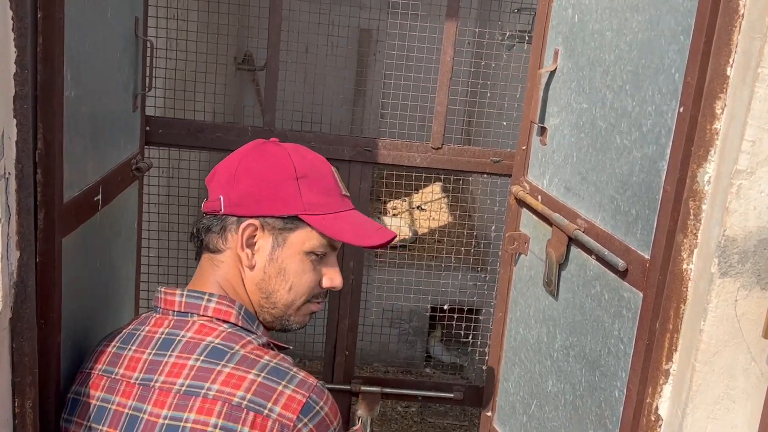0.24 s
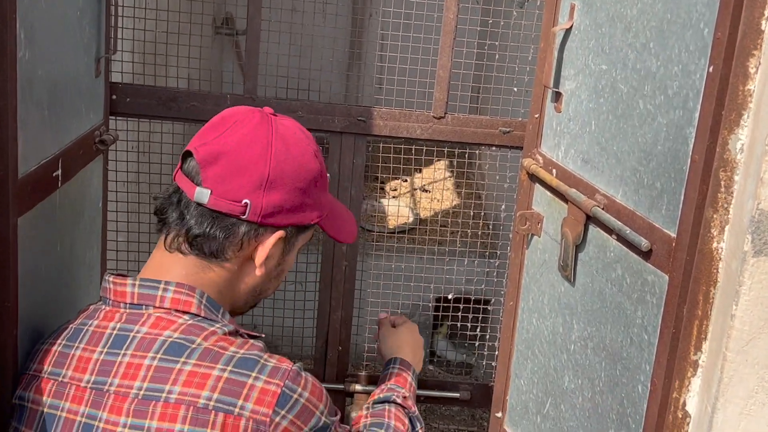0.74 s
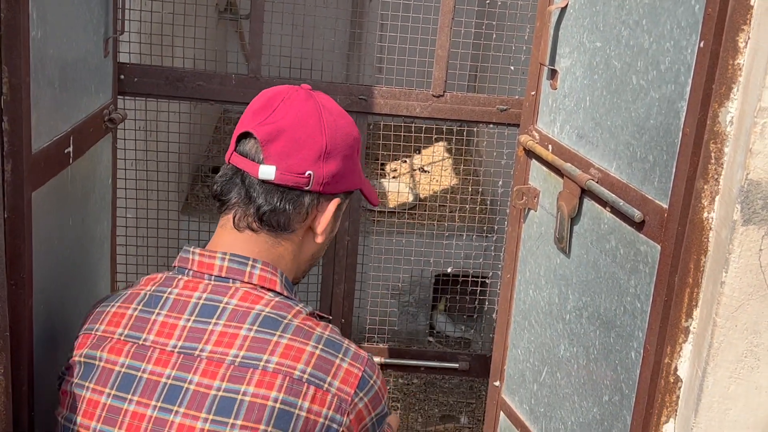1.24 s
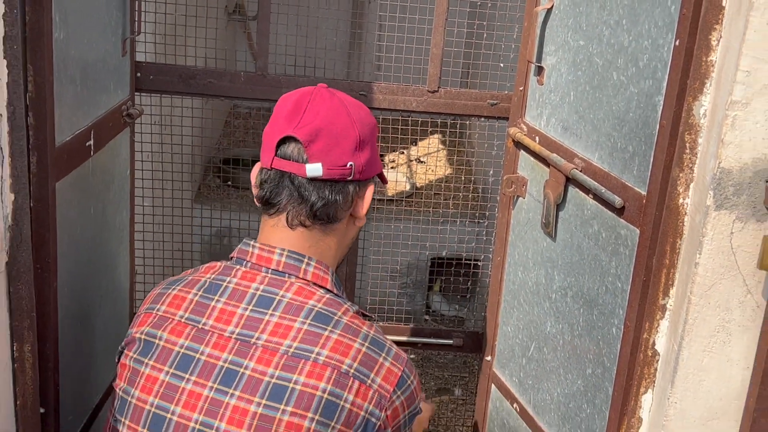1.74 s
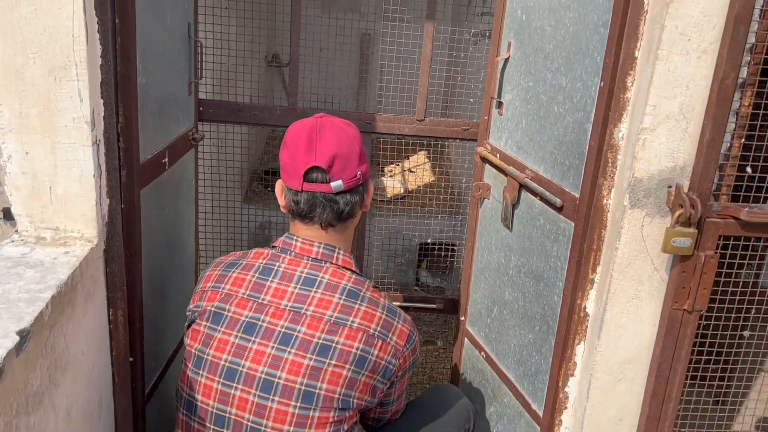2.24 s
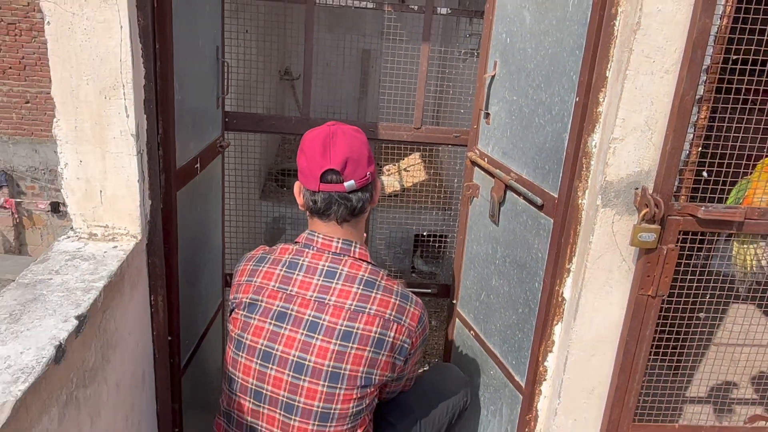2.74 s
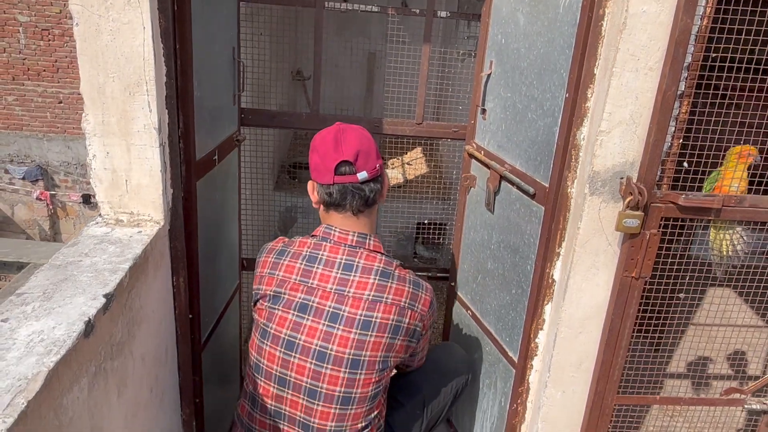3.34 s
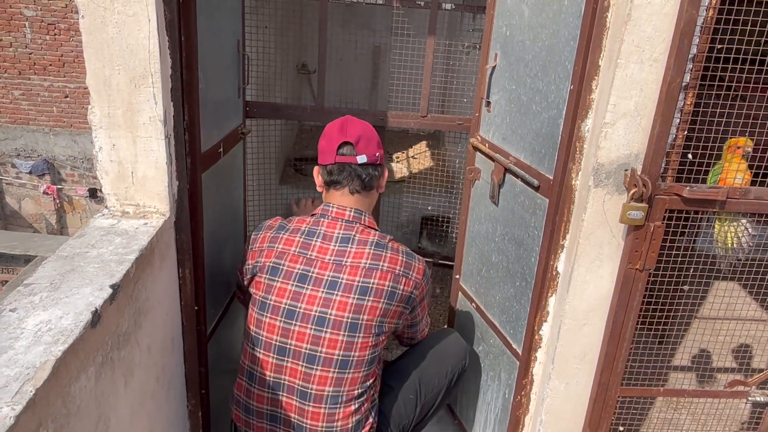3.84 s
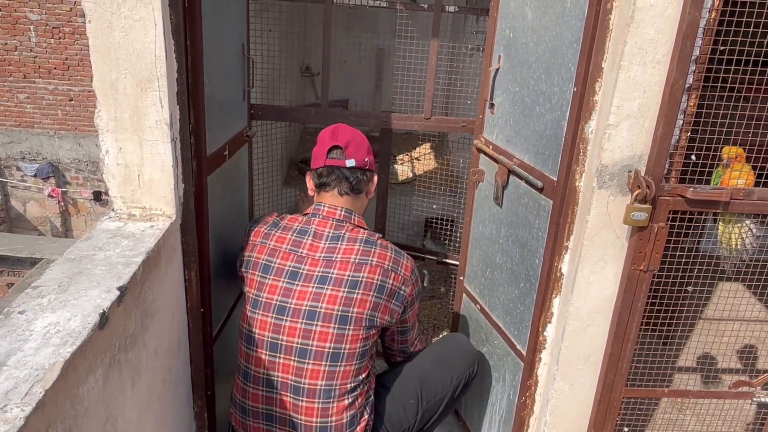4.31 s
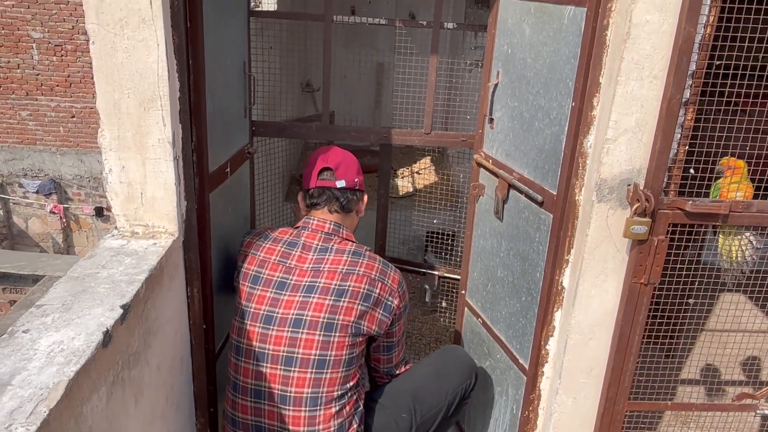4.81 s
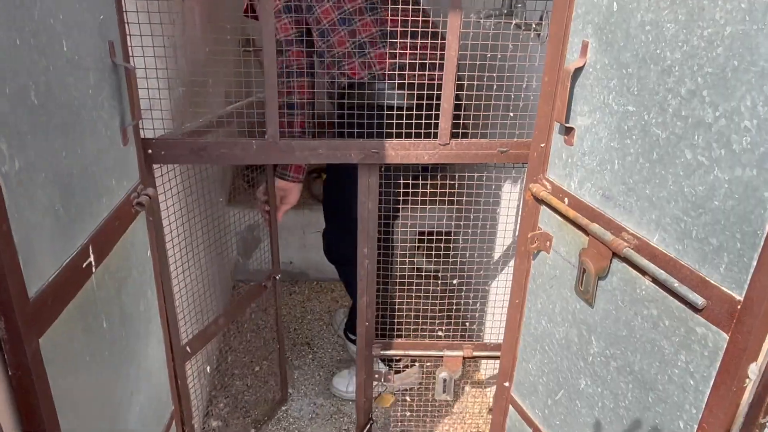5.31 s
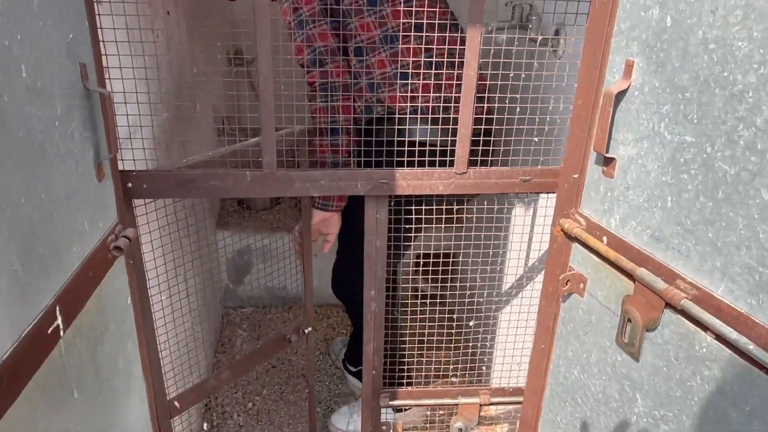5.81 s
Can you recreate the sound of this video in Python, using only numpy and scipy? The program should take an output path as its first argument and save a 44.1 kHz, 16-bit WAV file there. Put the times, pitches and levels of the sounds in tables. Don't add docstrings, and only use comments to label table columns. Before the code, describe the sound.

Parrots squawk shrilly and whistle in a caged yard while a steel mesh door knocks, squeaks and scrapes, with distant traffic behind.

```python
import sys
import numpy as np
from scipy import signal
from scipy.fft import rfft, irfft, next_fast_len
from scipy.io import wavfile
from scipy.ndimage import map_coordinates

SR = 44100
rng = np.random.default_rng(int(sys.argv[2]) if len(sys.argv) > 2 else 0)


def digitize_waveform(pressure):
    field = np.atleast_2d(pressure).T
    bounded = np.clip(field, -1, 1)
    quanta = np.round(bounded * 32767).astype(np.int16)
    wavfile.write(sys.argv[1], SR, quanta)


def ratio_of_db(decibels):
    return 10 ** (np.asarray(decibels, float) / 20)


N = 267334
TURN_S = 2.7
LEFT_RIGHT = np.array([[0.5], [-0.5]])

# time_s, level_db
TRAFFIC = [(0.0, -31.5), (0.5, -40.5), (0.54, -38), (0.57, -40.5), (1.04, -36.5), (1.23, -49),
           (1.55, -36.5), (2.45, -46), (2.67, -33), (2.88, -39), (3.41, -38), (3.59, -56.5), (3.83, -40.5),
           (3.9, -57.5), (4.59, -51.5), (4.62, -43), (4.71, -49), (6.06, -44.5)]
# freq_hz, level_db (per Hz)
RUMBLE = [(15, -31), (25, -24), (47, -1), (70, 2), (136, -8), (220, -17.5), (320, -21.5), (420, -18.5),
          (700, -120)]
# freq_hz, level_db (per Hz)
WASH = [(180, -3.5), (400, -2), (1400, -5), (3400, -15.5), (5500, -23), (8500, -28.5), (10700, -21),
        (12700, -22.5), (14200, -21.5), (16000, -24)]
# start_s, length_s, level_db
SHUFFLES = [
    (0.114, 0.39, -49.5),
    (0.496, 0.43, -47),
    (0.92, 0.53, -44.5),
    (1.258, 0.64, -47.5),
    (2.455, 0.27, -45.5),
    (3.0, .35, -60),
    (5.19, 0.42, -52.5),
    (5.519, .12, -52.5),
]
# start_s, peak_db, low_knock_db (against the peak), t60_s
KNOCKS = [(0.0313, -40.5, -0.5, 0.074), (0.1324, -11.5, -8, 0.06), (0.4958, -8.5, -23.5, 0.087),
          (0.7382, -49.5, 0, 0.072), (0.805, -51, 6.5, 0.11), (0.9173, -37, 1, 0.23),
          (1.1767, -39.5, 8.5, 0.33), (1.2471, -23, -3, 0.2), (1.3962, -21, -18.5, 0.22),
          (2.4803, -26.5, -1, 0.17), (2.9193, -43, -3, 0.72), (3.602, -46.5, -9, 0.1145),
          (4.4657, -32, -2, 0.21), (5.0829, -26, -6.5, 0.036), (5.1881, -26.5, -10.5, 0.3),
          (5.3472, -43, -6.5, 0.065), (5.3781, -56, 11, 0.011), (5.4445, -43.5, -36, 0.062),
          (5.475, -62, -8, 0.11), (5.5104, -49, -10, 0.067), (5.5342, -56.5, 12, 0.012),
          (5.5702, -44, -17, 0.05), (5.5927, -41.5, -33.5, 0.087), (5.7004, -48, -12, 0.082),
          (5.7572, -47, -10, 0.049), (5.7924, -51.5, 13, 0.025), (5.8852, -50, 19, 0.03)]
# freq_hz, level_db, t60_s
SHEET_MODES = [(1440, -2, 0.21), (2412, -42, 0.13), (4010, -4, 0.13), (5000, -3.5, 0.26), (5900, -6, 0.16),
               (8300, -8, 0.43), (11600, -10, 0.077), (13740, -6.5, 0.12), (15000, 4, 0.016)]
# start_s, freq_hz, level_db, t60_s
PINGS = [
    (3.3, 7900, -36, 0.2),
    (3.008, 11790, -28, .3),
    (.134, 13900, -31, 0.072),
]
# start_s, length_s, level_db
SQUEAK = (.36, 0.19, -44)
# freq_hz, level_db
HINGE_MODES = [(8274, -63), (10847, -53), (12086, -60), (12963, -75), (13937, -63), (14739, -51.5)]
# start_s, length_s, level_db
SCRAPES = [
    (0.912, 0.72, -56.5),
    (1.467, 0.54, -42),
    (1.829, 0.11, -23.5),
    (2.463, 0.32, -47.5),
    (3.7, 0.17, -56.5),
    (3.273, 0.27, -37),
    (5.194, 0.063, -35),
]
# freq_hz, level_db (per Hz)
SCRAPE_COLOUR = [(250, -7.5), (1400, -9), (2400, 0.5), (3500, 8.5), (6000, 7), (9600, 4.5), (10700, 8),
                 (12700, 7), (15500, -11)]
# start_s, length_s, top_pitch_hz, level_db
WHISTLES = [
    (1.005, .24, 2956, -28),
    (2.495, 0.26, 3027, -39.5),
    (3.703, 0.25, 3040, -32.5),
    (5.792, 0.25, 3170, -41.5),
]
# start_s, length_s, from_hz, to_hz, level_db
CHATTER = [(1.197, 0.067, 1626, 2582, -32.5), (1.27, 0.15, 2210, 2570, -36), (1.27, 0.064, 3690, 3500, -29),
           (1.388, .1, 2877, 2910, -34), (1.399, 0.077, 3630, 4080, -26), (1.456, 0.081, 3640, 3168, -23),
           (1.513, .1, 3436, 3923, -25.5), (1.811, 0.093, 3980, 3340, -26), (2.565, 0.086, 3056, 3460, -37),
           (2.7, 0.048, 1910, 2460, -47), (2.966, 0.089, 3073, 3060, -34), (3.048, .13, 3655, 3670, -27.5),
           (3.236, 0.09, 2354, 2550, -38), (3.263, 0.11, 3870, 3420, -32.5), (3.361, 0.11, 3600, 3990, -36),
           (3.38, 0.077, 3030, 2980, -37.5), (4.709, .12, 2964, 3830, -30.5),
           (4.963, 0.14, 3900, 3810, -42.5), (1.197, 0.076, 3860, 4900, -39.5),
           (1.287, 0.094, 3990, 4830, -38.5), (1.374, 0.1, 5400, 5930, -37), (1.842, 0.07, 4990, 6920, -24),
           (5.845, 0.152, 2593, 2606, -49), (2.932, 0.15, 3450, 3370, -39.5)]
# start_s, length_s, first_pitch_hz, level_db, end_half_tone_db (against the voice)
STEADY_SQUAWKS = [
    (1.615, 0.28, 2182, -20, -10.5),
    (1.855, 0.19, 2157, -15.5, -12.5),
    (4.47, .28, 2157, -25.5, -3.5),
]
# start_s, length_s, first_pitch_hz, level_db, end_half_tone_db (against the voice)
SHAKY_SQUAWKS = [
    (2.13, 0.23, 2267, -19, -20.5),
    (2.995, 0.26, 2232, -23.5, -24.5),
    (3.78, 0.24, 2306, -27.5, -4),
    (4.135, 0.22, 2306, -29.5, -3),
    (4.765, .2, 2324, -27.5, 1),
    (5.955, 0.3, 2286, -26.5, -10.5),
]
# freq_hz, level_db
THROAT = [(1000, -17.5), (2100, -11.5), (3100, -2), (4200, -3), (6300, -7), (8400, -11.5), (10500, -14.5),
          (12600, -24), (15000, -22.5)]
# start_s, length_s, pitch_hz, root_db, third_harmonic_db
HORNS = [
    (1.824, 0.69, 357.4, -33, -46.5),
    (5.646, 0.48, 349, -66, -49.5),
]
# freq_hz, t60_s
WALLS = [(300, 0.11), (2000, 0.47), (5000, 0.44), (14000, 0.11)]
# freq_hz, facing_cage_share, turned_away_share
APART = [(100, 0.88, 0.98), (796, 0.16, 0.81), (1670, 1, 1), (2440, 0.42, 1), (6050, .25, 1),
         (7500, 0.12, 1), (9000, 0.24, 0.013)]
# freq_hz, left_minus_right_db
SIDES = [(600, 0.5), (1600, -3), (2200, 0.5)]
# freq_hz, right_lead_half_turns
LEAD = [(400, 0), (1500, .6), (2000, -.3), (3500, -.12), (5000, 0), (5800, .25), (7000, 0), (8500, .5),
        (9400, 1), (10300, 1), (11300, 1.5), (12200, 2), (13300, 2), (14300, 2.5), (15000, 3)]


def unit(x):
    return x / np.sqrt(np.mean(x ** 2) + 1e-20)


def along(points, hz):
    f, v = np.transpose(points)
    return np.interp(np.log(hz + 1), np.log(f + 1), v)


def wobble(rate, size=N):
    knots = rng.standard_normal(int(size * rate / SR) + 4)
    return map_coordinates(knots, [np.arange(size) * rate / SR])


def filtered(x, response):
    m = next_fast_len(x.shape[-1] + 8192)
    return irfft(rfft(x, m) * response(np.fft.rfftfreq(m, 1 / SR)), m)[..., :x.shape[-1]]


def noise(spectrum, size=N):
    return unit(filtered(rng.standard_normal(size), lambda hz: ratio_of_db(along(spectrum, hz))))


def add(out, start_s, x):
    part = out[round(start_s * SR):][:len(x)]
    part += x[:len(part)]


def stroke(length_s, in_s, out_s, fade_db):
    t = np.arange(round(length_s * SR)) / SR
    edges = (1 - np.exp(-t / in_s)) ** 2 * (1 - np.exp((t - length_s) / out_s))
    return t, edges * ratio_of_db(-fade_db * t / length_s)


def sweep(hz):
    return 2 * np.pi * np.cumsum(hz) / SR


def cricket():
    out, length_s = np.zeros(N), 3.9
    t, gain = stroke(length_s, 0.0011, 0.12, fade_db=2.4 * length_s)
    level_db = -53.5 + 4.5 * wobble(8.1, size=len(t))
    add(out, 0, gain * ratio_of_db(level_db) * np.sin(2 * np.pi * 2738 * t + 0.89 * wobble(49, size=len(t))))
    return out


def street():
    rumble_db = np.interp(np.arange(N) / SR, *np.transpose(TRAFFIC))
    wash_gain = ratio_of_db(-58 + 0.067 * (rumble_db - rumble_db.mean()))
    for start_s, length_s, db in SHUFFLES:
        t, gain = stroke(length_s, 0.0083, 0.03, fade_db=29)
        add(wash_gain, start_s, ratio_of_db(db) * gain)
    shared = noise(RUMBLE) * ratio_of_db(2.2 * wobble(9))
    rumble = unit(shared + 0.38 * np.array([noise(RUMBLE), noise(RUMBLE)]))
    wash = unit(0.5 * noise(WASH) + np.array([noise(WASH), noise(WASH)]))
    return ratio_of_db(rumble_db) * rumble + wash_gain * ratio_of_db(7 + 2.2 * wobble(5.46)) * wash


def knocks():
    out, t = np.zeros(N), np.arange(SR // 3) / SR
    for start_s, db, low_db, t60_s in KNOCKS:
        bright = noise([(1500, -34), (5000, -11.5), (8000, -5.5), (14000, -4), (16000, -18.5)], size=len(t))
        dull = noise([(150, 6), (500, -28), (1500, 4), (3500, 3), (7000, -7)], size=len(t))
        ring = np.zeros(len(t))
        for hz, mode_db, mode_t60_s in SHEET_MODES:
            mode_db = mode_db + rng.normal(0, 3)
            ring += ratio_of_db(mode_db - 60 * t / mode_t60_s) * np.sin(2 * np.pi * hz * t)
        crack = 0.9 * ratio_of_db(-60 * t / 0.01)
        fade = ratio_of_db(-60 * t / max(t60_s, 0.01))
        hit = bright * (crack + 0.99 * fade)
        hit += ratio_of_db(low_db + 5.5) * dull * np.sqrt(fade)
        hit += 0.057 * fade * unit(ring)
        add(out, start_s, ratio_of_db(db - 9.5) * hit)
    return out


def pings():
    out, t = np.zeros(N), np.arange(SR // 8) / SR
    for start_s, hz, db, t60_s in PINGS:
        tone = np.sin(2 * np.pi * hz * t + 0.6 * wobble(200, size=len(t)))
        add(out, start_s, ratio_of_db(db - 60 * t / t60_s) * tone)
    return out


def hinge():
    out = np.zeros(N)
    start_s, length_s, db = SQUEAK
    t, gain = stroke(length_s, 0.017, 0.004, fade_db=13)
    n = len(t)
    top_db = max(mode_db for _, mode_db in HINGE_MODES)
    squeak = ratio_of_db(db + 1) * noise([(3500, 2), (7000, -8.5), (11000, -5), (15500, 3.5)], size=n)
    for hz, mode_db in HINGE_MODES:
        level_db = db + mode_db - top_db + 8 + 3.2 * wobble(87, size=n)
        squeak += ratio_of_db(level_db) * np.sin(2 * np.pi * hz * t + 1.6 * wobble(440, size=n))
    add(out, start_s, gain * squeak)
    return out


def scrapes():
    out = np.zeros(N)
    for start_s, length_s, db in SCRAPES:
        t, gain = stroke(length_s, 0.0062, 0.034, fade_db=27.5)
        grain = ratio_of_db(2.5 * wobble(400, size=len(t)))
        add(out, start_s, gain * ratio_of_db(db + 10) * unit(grain * noise(SCRAPE_COLOUR, size=len(t))))
    return out


def hoarse(hz, octave_db, rough):
    n = len(hz)
    phase = sweep(hz * (1 + 0.05 * rough * wobble(350, size=n)))
    breath = 0.5 * rough * wobble(1200, size=n)
    strength = ratio_of_db(6.34 * rough * wobble(107.7, size=n)) + breath
    return 2.35 * strength * (np.sin(phase) + ratio_of_db(octave_db) * np.sin(2 * phase))


def whistles():
    out, from_hz, climb_s = np.zeros(N), 1500, 0.16
    for start_s, length_s, top_hz, db in WHISTLES:
        t, gain = stroke(length_s, 0.07, 0.036, fade_db=10.5)
        climb = np.sin(np.pi / 2 * np.minimum(t / climb_s, 1))
        tone = hoarse(from_hz + (top_hz - from_hz) * climb, octave_db=-1 - 32 * climb, rough=0.44)
        add(out, start_s, gain * ratio_of_db(db + 9.5) * tone)
    return out


def chatter():
    out = np.zeros(N)
    for start_s, length_s, from_hz, to_hz, db in CHATTER:
        t, gain = stroke(length_s, 0.013, 0.018, fade_db=-2.5)
        tone = hoarse(from_hz + (to_hz - from_hz) * t / length_s, octave_db=-20, rough=0.55)
        add(out, start_s, gain * ratio_of_db(db) * tone)
    return out


def squawks(calls, sag_hz_per_s, droop_hz, shake, breath_db):
    out, gasp_s = np.zeros(N), 0.03
    for start_s, length_s, first_hz, db, end_half_db in calls:
        t, gain = stroke(length_s, 0.022, 0.02, fade_db=1)
        n = len(t)
        scoop = 600 * np.exp(-t / 0.009)
        droop = droop_hz * np.exp((t - length_s) / 0.012)
        hz = first_hz - sag_hz_per_s * t - scoop - droop
        tremble = shake * np.sin(sweep(85 * (1 + 0.263 * wobble(30.03, size=n))))
        phase = sweep(hz * (1 + 0.014 * tremble + 0.018 * wobble(450, size=n)))
        gasp = np.exp(-t / gasp_s)
        voice = ratio_of_db(breath_db + 14 * gasp) * noise(THROAT, size=n)
        flutter_db = 2.8 * (0.5 * tremble + wobble(400.3, size=n))
        half_db = end_half_db - 7 * (1 - t / length_s) + 3.5 * wobble(19.3, size=n)
        for k in np.arange(1, 15) / 2:
            level_db = along(THROAT, k * hz) + 0.5 * np.log2(k / 2)
            level_db += flutter_db + 2 * wobble(42.65, size=n)
            if k % 1 > 0:
                level_db += half_db - 6 * abs(np.log2(2 * k / 3))
            tone = np.sin(k * phase + rng.uniform(0, 2 * np.pi))
            voice += (1 - gasp) * ratio_of_db(level_db) * tone * (k * hz < 16000)
        add(out, start_s, gain * ratio_of_db(db + 6) * voice)
    return out


def horns():
    out = np.zeros(N)
    for start_s, length_s, hz, root_db, third_db in HORNS:
        t, gain = stroke(length_s, 0.0168, 0.03, fade_db=28)
        phase = 2 * np.pi * hz * t + 0.63 * wobble(22, size=len(t))
        tone = ratio_of_db(root_db) * (np.sin(phase) + 0.18 * np.sin(2 * phase)) + ratio_of_db(third_db) * np.sin(3 * phase)
        add(out, start_s, gain * ratio_of_db(4.1 * wobble(31.1, size=len(t))) * tone)
    return out


def walls(x, alike):
    hz, t, z = signal.stft(rng.standard_normal((3, SR // 2)), SR, nperseg=256)
    decay = ratio_of_db(-60 * t / along(WALLS, hz)[:, None])
    tail = signal.istft(z * decay, SR, nperseg=256)[1]
    pair = alike * tail[0] + (1 - alike) * tail[1:]
    late = np.pad(x, (250, 0))[None]
    return signal.fftconvolve(late, pair / np.linalg.norm(pair[0]), axes=1)[:, :N]


def turned():
    return np.clip((np.arange(N) / SR - TURN_S) * 4 + 0.5, 0, 1)


def aside(x, lag_s, left_db):
    def ports(hz):
        band = along([(1500, 0), (3500, 0.066), (5500, 0.69), (7000, 0)], hz)
        lag = np.exp(-2j * np.pi * LEFT_RIGHT * lag_s * np.clip(hz - 2000, 0, 4800))
        return ratio_of_db(LEFT_RIGHT * left_db * band) * lag
    return filtered(x, ports)


def scene():
    birds = whistles() + chatter()
    birds += squawks(STEADY_SQUAWKS, sag_hz_per_s=910, droop_hz=432, shake=0.65, breath_db=-18)
    birds += squawks(SHAKY_SQUAWKS, sag_hz_per_s=1500, droop_hz=200, shake=1.63, breath_db=-28)
    handling = knocks() + pings() + hinge() + scrapes()
    away = turned()
    heard = (1 - away) * birds + away * aside(birds, lag_s=1 / 2400, left_db=11.5)
    echoes = ratio_of_db(-8) * walls(birds, alike=0.4) + ratio_of_db(-3) * walls(handling, alike=0.42)
    return heard + handling + echoes + cricket() + street() + horns()


def roll_off(x):
    return signal.sosfilt(signal.butter(12, 16290, fs=SR, output="sos"), x)


def record(dry):
    hz_at, facing, away = np.transpose(APART)
    mid, side = (dry[0] + dry[1]) / 2, (dry[0] - dry[1]) / 2
    side_facing = filtered(side, lambda hz: along(np.c_[hz_at, facing], hz))
    side_away = filtered(side, lambda hz: along(np.c_[hz_at, away], hz))
    side = (1 - turned()) * side_facing + turned() * side_away

    def ports(hz):
        phase = np.exp(-1j * np.pi * LEFT_RIGHT * along(LEAD, hz))
        return ratio_of_db(LEFT_RIGHT * along(SIDES, hz)) * phase * (hz < 16200)
    wide = filtered(np.array([mid + side, mid - side]), ports)
    ceiling = 0.95
    wide = wide / (1 + (wide / ceiling) ** 4) ** 0.25
    return roll_off(wide)


dry = scene()
out = record(dry)
digitize_waveform(out)
```